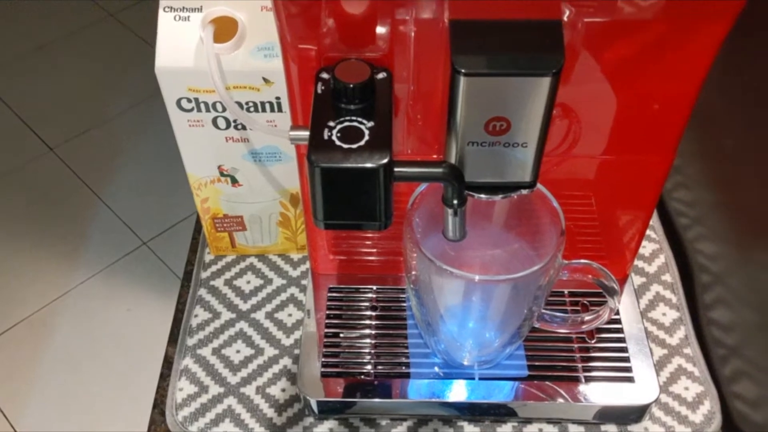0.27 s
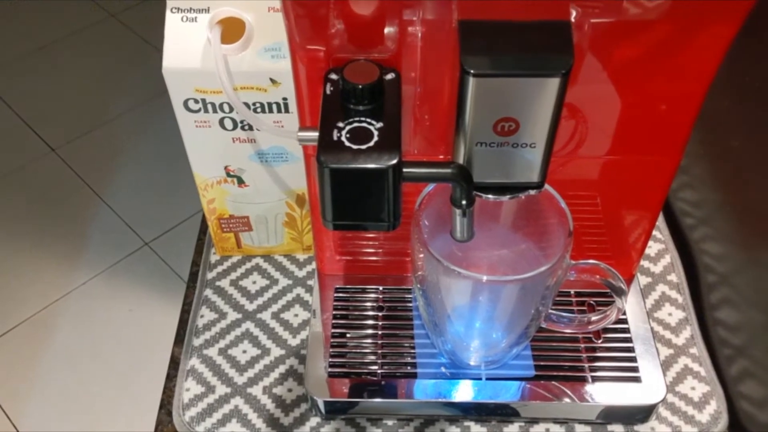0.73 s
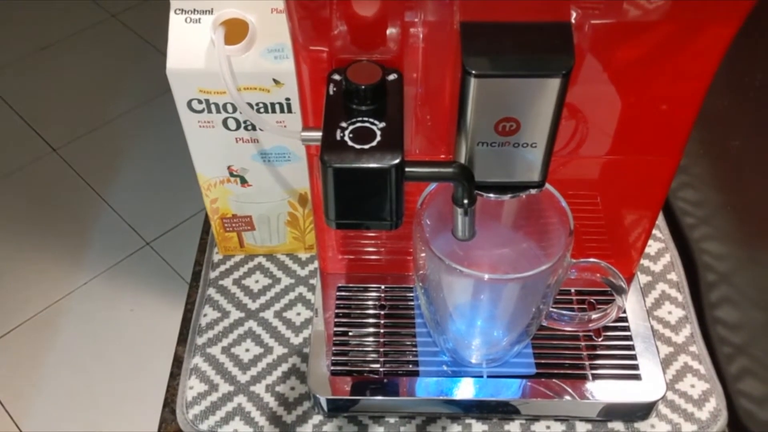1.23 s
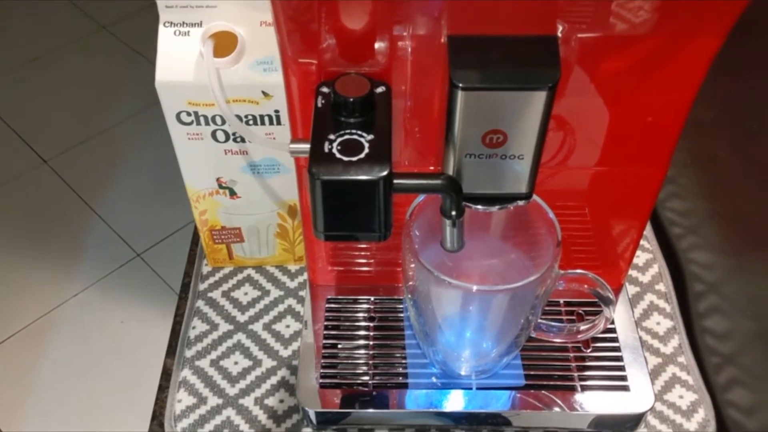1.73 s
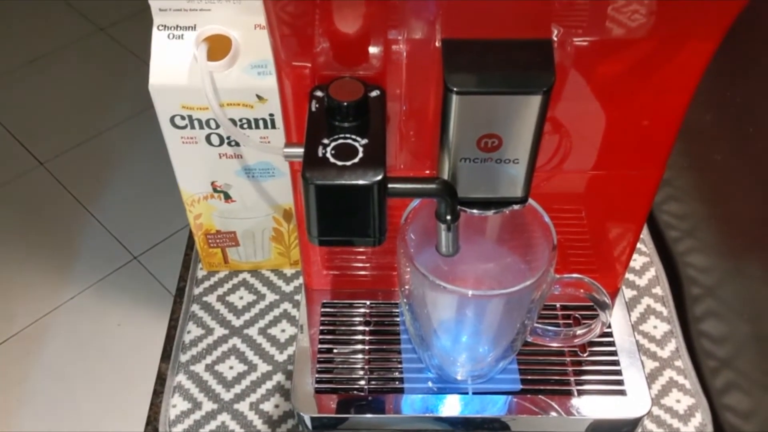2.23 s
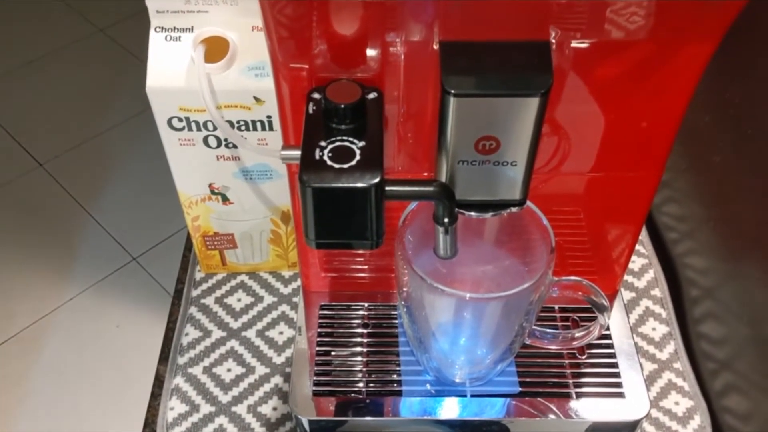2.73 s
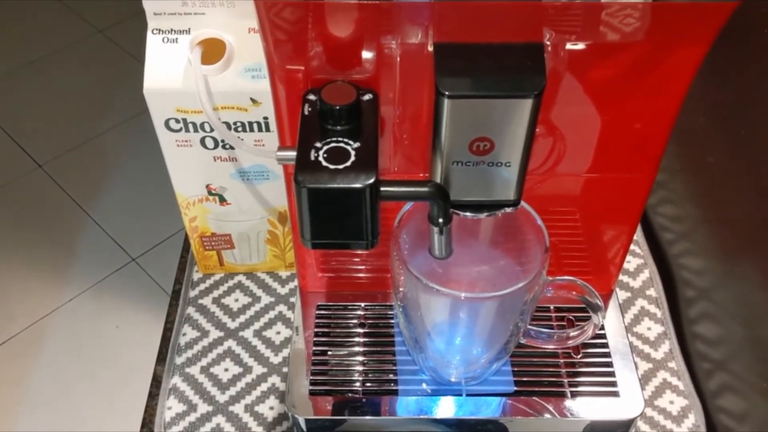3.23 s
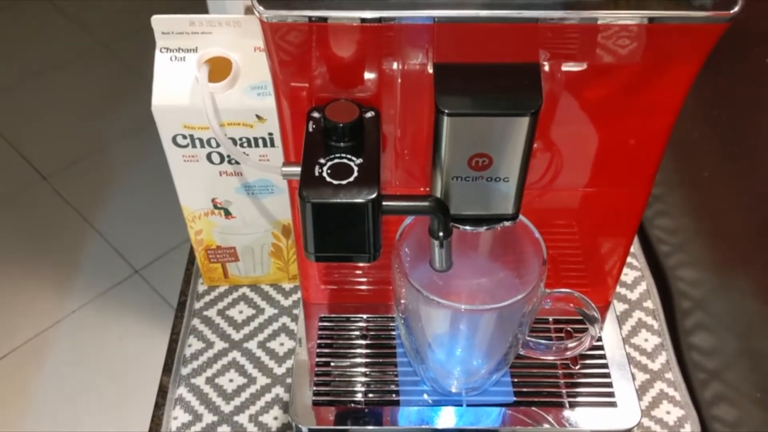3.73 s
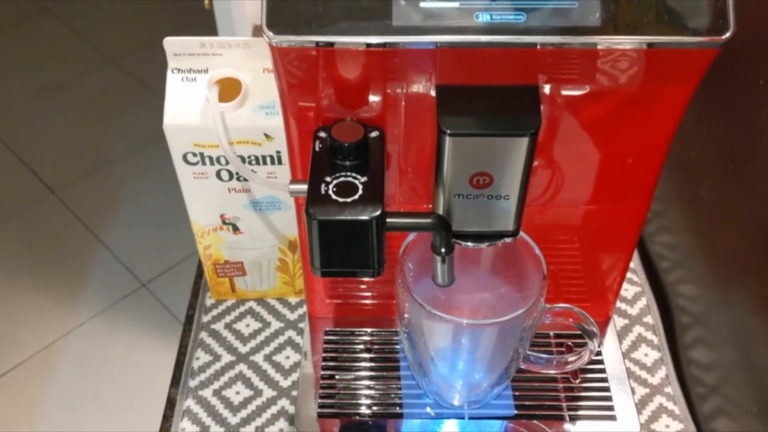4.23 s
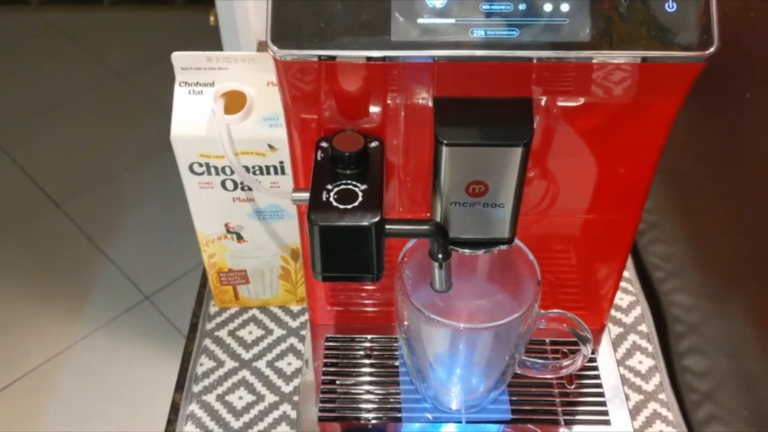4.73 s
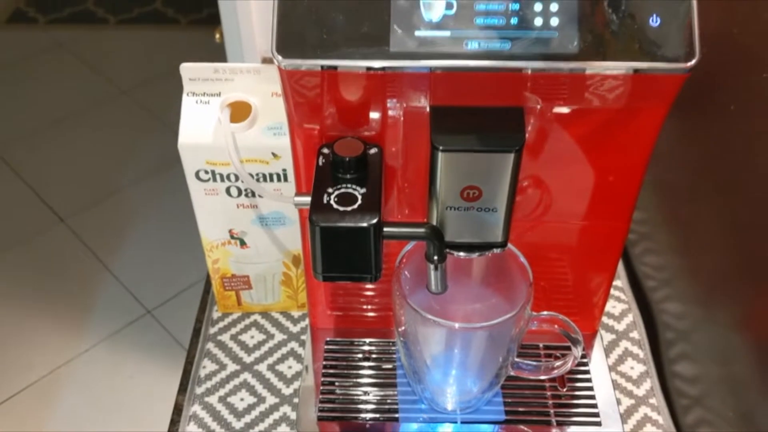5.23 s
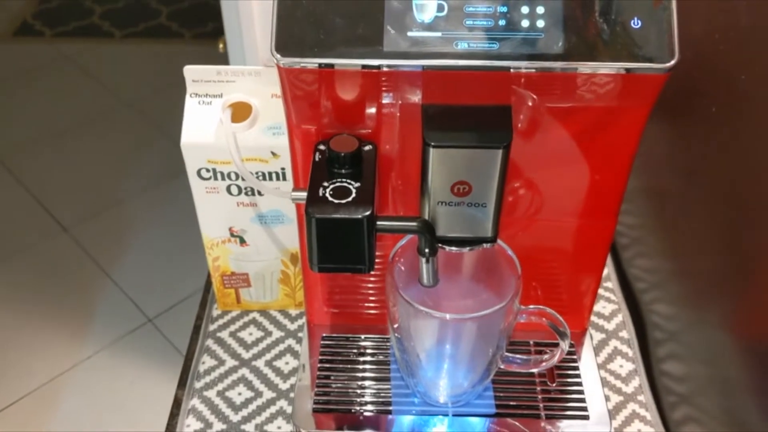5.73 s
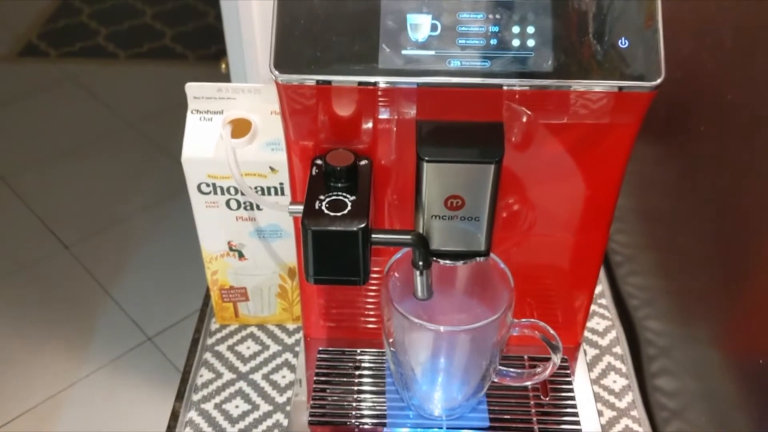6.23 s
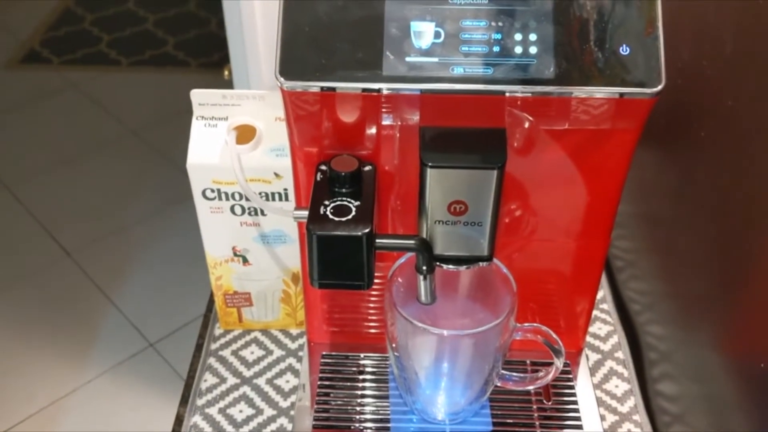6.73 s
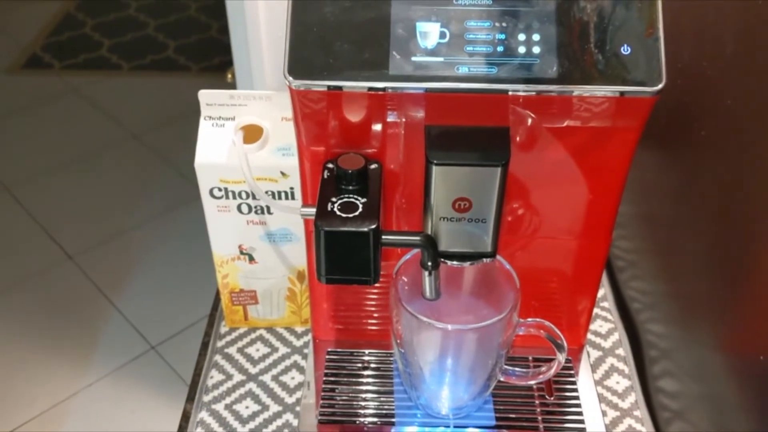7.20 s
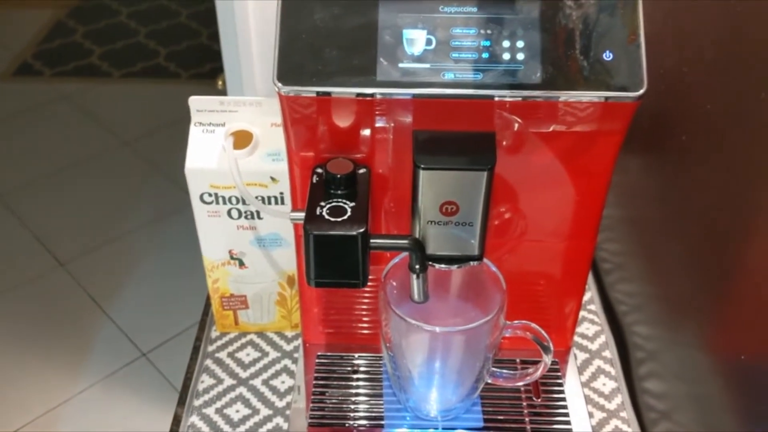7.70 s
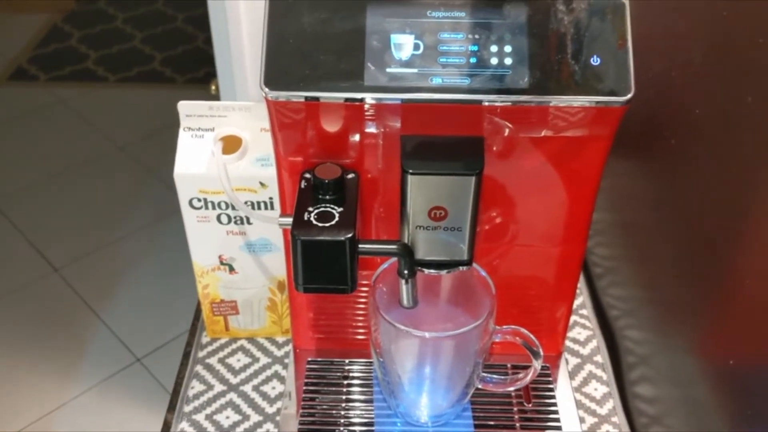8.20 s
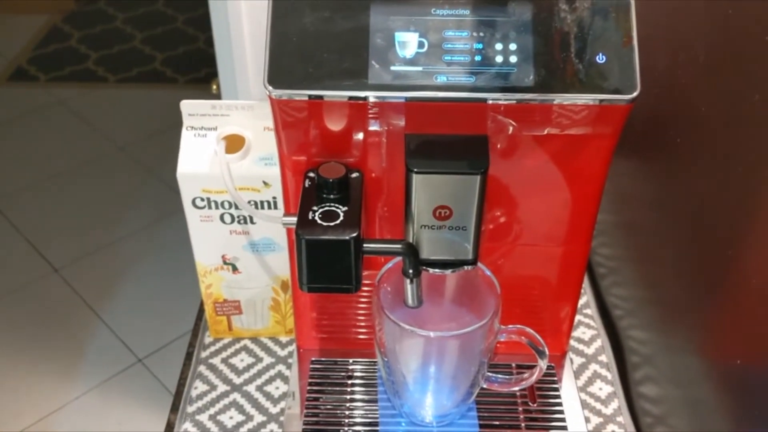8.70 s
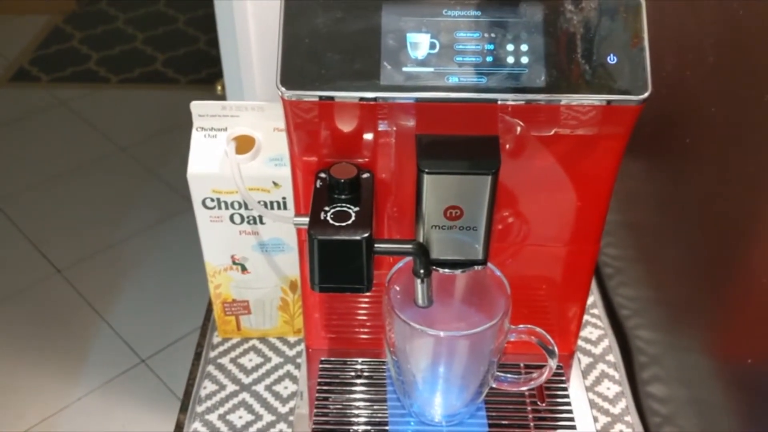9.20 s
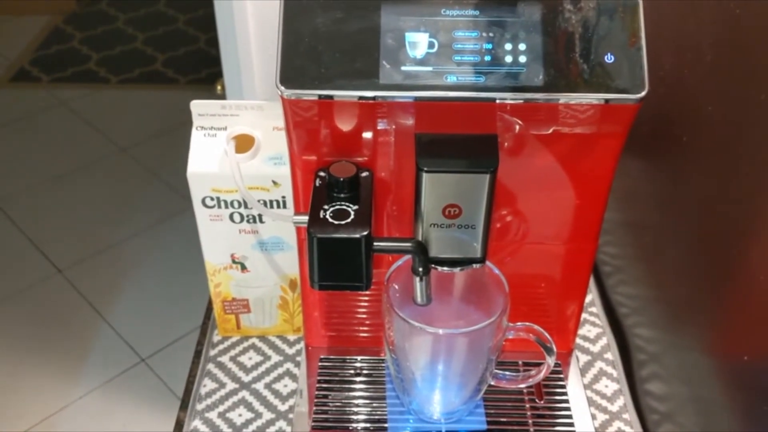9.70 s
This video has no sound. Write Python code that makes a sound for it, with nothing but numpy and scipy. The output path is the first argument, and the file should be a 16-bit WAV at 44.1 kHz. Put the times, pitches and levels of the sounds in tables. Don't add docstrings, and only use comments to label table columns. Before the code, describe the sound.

From 0 to about 3 seconds, a close coffee machine jets steam and milk into a glass: a loud, dense roar, hollow and resonant in the low mids, with a fainter high hiss and breathy whistling edge at the nozzle. It sputters finely and sags then surges with gulps, clearest around 1.7, 2.2 and 2.7 seconds. Near 3.0 the flow collapses, and at 3.1 a valve snaps shut with a dry double crack, dull thud and short room echo. A brief quiet gap reveals fridge hum and low building rumble. From 3.4, with a quick double around 3.63, a far softer piston pump beats evenly four times a second until the end near 10 seconds. Each stroke has a short metallic click, housing rattle, hollow low boom and tiny bouncing ticks; the boom grows slightly as pressure builds. Sound sits heavily right, the left weak and muffled.

```python
import sys
import numpy as np
from scipy import signal
from scipy.fft import rfft, irfft, next_fast_len
from scipy.io import wavfile
from scipy.ndimage import uniform_filter1d, map_coordinates

SR = 44100
rng = np.random.default_rng(int(sys.argv[2]) if len(sys.argv) > 2 else 0)


def volts_from_db(level):
    exponent = np.asarray(level, float) / 20
    return 10 ** exponent


def master_out(mix):
    frames = np.transpose(np.atleast_2d(mix))
    ceiling = np.clip(frames, -1, 1)
    pcm = np.round(ceiling * 32767).astype(np.int16)
    wavfile.write(sys.argv[1], SR, pcm)


N = 438794

# (time [s], roar level [dB])
STEAM_FLOW = [
    (0, -15),
    (1, -14.5),
    (2, -14.5),
    (2.92, -15),
    (3.01, -20),
    (3.1, -36),
]
# (frequency [Hz], density [dB per Hz])
ROAR_COLOUR = [(35, -71), (60, -30), (138, -21), (233, -3.5), (264, -16), (362, -0.5), (431, -10.5),
               (639, -2), (849, -7.5), (1730, -18.5), (2600, -39.5), (3380, -41.5), (5720, -120)]
# (frequency [Hz], width [Hz], level over the colour [dB])
GLASS_MODES = [(142.4, 15, 13.5), (200, 47, 2.5), (234.6, 9, 6), (244.5, 17, -18.5), (299, 21, 10.5),
               (308, 10, -17), (358, 16, 0), (437, 21, -6), (465, 80, 2.5), (568, 21, -13.5),
               (624.8, 31, 6.5), (679, 42, 3.5), (780, 36, 4.5), (850, 31, -3), (890, 12, -2),
               (951, 91, 5.5), (988, 19, -13.5), (1072, 8.2, -20), (1290, 22, -6), (1233, 35, 5),
               (1334, 22, 6), (1710, 110, 1), (1696, 19, 7.5), (1863, 79, 8)]
# (frequency [Hz], level against the roar [dB])
AIR_COLUMN = [(145, -18), (241, -17)]
# (frequency [Hz], density [dB per Hz])
HISS_COLOUR = [(1000, -40), (1800, -6.5), (2360, -12), (2970, -13.5), (4230, -9.5), (7570, -19),
               (10300, -14), (13100, -18.5), (16000, -19.5)]
# (frequency [Hz], width [Hz], level over the colour [dB])
NOZZLE_MODES = [(3440, 59, 4.5), (3774, 43, 9), (4160, 630, 3), (6560, 220, 2), (8880, 320, 8.5),
                (11800, 310, 9)]
# (time [s], peak level [dB])
VALVE_SNAP = [
    (3.118, -7.5),
]


def steam():
    flow_db = curves(STEAM_FLOW)[0]
    swing_db, lift = gulps()
    flowing = np.arange(N) < VALVE_SNAP[0][0] * SR

    roar_db = flow_db + swing_db + 5 + 0.96 * wobble(24.97)
    column = hum(AIR_COLUMN, wander_db=1.0, wander_turns=0.21)
    roar = volts_from_db(roar_db) * (noise(ROAR_COLOUR, GLASS_MODES, patchy_db=0.43) + column)

    lower_hz = 10230 + 170 * lift
    upper_hz = 14130 + 130 * lift
    tones = volts_from_db(1.5 * wobble(9.8)) * whistle(lower_hz, width_hz=300)
    tones += volts_from_db(-3.0 + 3.6 * wobble(8.4)) * whistle(upper_hz, width_hz=250)
    tone_db = -14 + 1.6 * lift

    hiss_db = -33 + 1.35 * (flow_db - STEAM_FLOW[0][1]) + 0.49 * swing_db
    sputter_db = 0.79 * wobble(26.72) + 0.86 * wobble(140)
    hiss = noise(HISS_COLOUR, NOZZLE_MODES, patchy_db=1.0) + volts_from_db(tone_db) * tones
    return flowing * (roar + volts_from_db(hiss_db + 7.5 + sputter_db) * hiss)


# (time [s], size [dB])
MILK_GULPS = [
    (.1, 0),
    (.73, -2.3),
    (0.971, 1),
    (1.199, 0.8),
    (1.659, 2),
    (1.99, 1),
    (2.238, 1.8),
    (2.68, 3),
]


def gulps():
    sag_s, surge_s, sing_s = 0.045, 0.034, 0.12
    early = N // 3
    swing_db, lift = np.zeros((2, N))
    for start, db in MILK_GULPS:
        t = np.arange(early) / SR - start
        sag = -np.exp(-abs(t) / sag_s)
        surge = np.exp(-abs(t) / surge_s)
        swing_db[:early] += db * np.where(t < 0, sag, surge)
        lift[:early] += db * np.exp(-((t / sing_s) ** 2) ** 2)
    return swing_db, lift


def whistle(hz, width_hz):
    hops = np.repeat(rng.standard_normal(N // 2000 + 1), 2000)[:N]
    turn = np.exp(2j * np.pi * np.cumsum(hz + 190 * hops) / SR)
    a, b = filtered(rng.standard_normal((2, 2, N)), lambda f: 1 / (1 + (f / width_hz) ** 2))
    return unit(np.real((a + 1j * b) * turn))


# (frequency [Hz], density [dB per Hz])
CRACK_COLOUR = [(120, -30), (200, -25), (880, 5.5), (1500, -10), (2280, -5.5), (3500, -10), (4700, -3.5),
                (5800, -12.5), (7070, -30), (9300, 2.5), (13400, -4.5), (16000, -23)]
# (frequency [Hz], width [Hz], level over the colour [dB])
SOLENOID_MODES = [(865, 180, 7), (1410, 160, 17), (2330, 230, 13), (4470, 360, 9), (5500, 300, 7.5)]
# (frequency [Hz], density [dB per Hz])
KNOCK_COLOUR = [(60, -44), (120, -8.5), (180, -1), (250, -4.5), (400, -9), (600, -15.5), (1000, -15.5),
                (1500, -19), (2100, -22.5), (3000, -34.5), (5000, -42.5)]
# (frequency [Hz], width [Hz], level over the colour [dB])
HOUSING_MODES = [(316, 16, -2), (412.4, 55, 6), (523, 14, 6.5), (616, 20, 7), (816, 160, 6), (998, 59, 5),
                 (1090, 33, 1.5), (1370, 110, 4), (1420, 87, 7), (1720, 50, 2), (1950, 37, 7)]


def valve():
    s, db = VALVE_SNAP[0]
    crack = bursts([s, s + 0.0034], [db + 4.5, db - 1.5], rise=0.00034, t60=0.02)
    crack = crack * noise(CRACK_COLOUR, SOLENOID_MODES)
    jolt = bursts([s + 0.004], [-19], rise=0.008, t60=0.17)
    thud = jolt * np.sin(2 * np.pi * 177 * np.arange(N) / SR)
    shake = bursts([s + 0.0059], [db - 15.0], rise=0.0056, t60=0.23) * noise(KNOCK_COLOUR, HOUSING_MODES)
    return crack + thud + shake


# (delay from landing [s], level [dB], drift as the water warms [dB per s])
BALL_BOUNCES = [
    (-.038, -10.5, 0),
    (-.030, -5, -1.1),
    (-.013, -7, .6),
    (0, -3, 0.09),
    (.013, -9, -0.5),
    (.026, -14, 0),
]
# (frequency [Hz], density [dB per Hz])
TICK_COLOUR = [(1500, -6.5), (3000, -13), (6000, -13), (9000, -12), (15500, -14.5), (16500, -60)]
# (frequency [Hz], width [Hz], level over the colour [dB])
BALL_MODES = [(4153, 1040, 13.5), (4120, 320, 2.5), (11350, 1100, 8)]


def pump(blows):
    s, db = np.transpose(blows)[:2]
    rattle = bursts([s - 0.016, s - 0.0012, s + 0.0092], [db - 11, db + 4.5, db - 2.0], rise=0.0068, t60=0.21)
    rattle = rattle * noise(KNOCK_COLOUR, HOUSING_MODES)
    rattle *= volts_from_db(1.94 * wobble(170) - 1.12)

    landing, tick_db = s + 0.0375, db - 5
    delay, bounce_db, drift_db = np.transpose(BALL_BOUNCES)
    strength_db = tick_db[:, None] + bounce_db + drift_db * (s[:, None] - s[0])
    strength_db += 0.9 * rng.standard_normal(strength_db.shape)
    ticks = bursts(landing[:, None] + delay, strength_db + 3.5, rise=0.00059, t60=0.036)
    return contacts(blows) + rattle + ticks * noise(TICK_COLOUR, BALL_MODES)


# (time [s], peak level [dB])
PUMP_RESTARTS = [
    (3.386, -28.5),
    (3.624, -26.5),
    (3.636, -33),
    (3.868, -28),
    (5.077, -29.5),
    (6.56, -29),
    (8.043, -30),
    (9.526, -32),
]
# (level [dB], level [dB])
BOOM_DB = (-13.5, -4)
# (pitch [Hz], pitch [Hz])
BOOM_HZ = (232.4, 246.2)


def strokes():
    beat_s, build_s = 0.2498, 2
    start, level_db = np.transpose(PUMP_RESTARTS)
    ends = np.append(start[1:], N / SR) - beat_s / 2
    rounds = [np.arange(a, max(a + 1 / SR, b), beat_s) for a, b in zip(start, ends)]
    s = np.concatenate(rounds)
    last = np.concatenate([(r == r[-1]) & (len(r) > 2) for r in rounds])
    pressure = 1 - np.exp(-(s - s[0]) / build_s)
    chance = rng.standard_normal((len(s), 4))
    db = np.repeat(level_db, [len(r) for r in rounds])
    db = db + 0.5 * (1 - pressure) + 0.4 * chance[:, 0]
    boom_db = np.interp(pressure, [0, 1], BOOM_DB) + 3.5 * last + 0.52 * chance[:, 1]
    boom_hz = np.interp(pressure, [0, 1], BOOM_HZ) + 3 * chance[:, 2]
    contact_db = 3 + chance[:, 3]
    return np.transpose([s, db, boom_db, boom_hz, contact_db])


# (frequency [Hz], level [dB], t60 [s])
ARMATURE_MODES = [(1255, -2.5, 0.076), (1536, -4.5, 0.084), (1690, -11, 0.073), (1970, 1.5, 0.027),
                  (2500, -11, 0.042)]


def contacts(blows):
    ring, t = np.zeros(N + SR), np.arange(SR // 8) / SR
    hz, mode_db, t60 = np.transpose(ARMATURE_MODES)[:, :, None]
    chances = rng.standard_normal((len(blows), 2, len(ARMATURE_MODES), 1))
    onset = 1 - np.exp(-t / 0.0053)
    for (start, db, _, _, contact_db), (level_chance, pitch_chance) in zip(blows, chances):
        decay = volts_from_db(mode_db + 0.53 * level_chance - 60 * t / t60)
        modes = decay * np.sin(2 * np.pi * hz * (1 + 0.022 * pitch_chance) * t)
        first = round((start - 0.003) * SR)
        ring[first:][:len(t)] += volts_from_db(db + contact_db) * onset * modes.sum(axis=0)
    return ring[:N]


def booms(blows):
    boom, t = np.zeros(N + SR), np.arange(SR // 4) / SR
    travel = np.minimum(t / 0.044, 1)
    flutter = 1 + 0.5 * np.cos(2 * np.pi * (t - 0.058) / 0.0268)
    swell = np.sin(np.pi * travel) + volts_from_db(-5.5) * travel * flutter * volts_from_db(-60 * t / 0.5)
    counter = np.sin(2 * np.pi * 60 * t) * np.sin(np.pi * np.minimum(t / 0.11, 1))
    for start, level_db, boom_db, hz, _ in blows:
        housing = volts_from_db(boom_db + 8.0) * swell * np.sin(2 * np.pi * hz * t)
        first = round((start - 0.004) * SR)
        boom[first:][:len(t)] += volts_from_db(level_db) * (housing + volts_from_db(-3.5) * counter)
    return boom[:N]


# (frequency [Hz], t60 [s])
WALL_DECAY = [(100, 0.53), (500, 0.6), (2000, 0.49), (5000, 0.37), (10000, 0.19), (16000, 0.32)]


def walls(x):
    hz, t, z = signal.stft(rng.standard_normal((2, SR // 2)), SR, nperseg=256)
    decay = volts_from_db(-60 * t / along(WALL_DECAY, hz)[:, None])
    tail = signal.istft(z * decay, SR, nperseg=256)[1]
    late = np.pad(x, ((0, 0), (260, 0)))
    return signal.fftconvolve(late, tail / np.linalg.norm(tail[0]), axes=1)[:, :N]


# (frequency [Hz], density [dB per Hz])
AIR_COLOUR = [(60, -31), (100, -10.5), (200, -2.5), (276, -10), (396, -8.5), (460, -17), (1300, -21),
              (2840, -31), (4070, -33), (7370, -40.5), (11500, -37), (16000, -40)]
# (frequency [Hz], width [Hz], level over the colour [dB])
FRIDGE_MODES = [(116, 8.7, -7), (209, 21, 4), (385, 25, 2.5), (506, 18, 7.5)]
# (frequency [Hz], level [dB rms])
FRIDGE_MOTOR = [(119.5, -52), (191.5, -43)]
# (frequency [Hz], density [dB per Hz])
RUMBLE_COLOUR = [(8.8, -54), (15, -49), (34, 1.5), (54, -3.5), (74, 0.5), (103, -10.5), (130, -28),
                 (170, -33), (290, -120)]
# (time [s], level [dB])
PHONE_GAIN = [
    (0, -12),
    (3.3, -6),
    (3.5, -1),
    (9.95, -4),
]


def kitchen():
    air = volts_from_db(-41 + 1.2 * wobble(4.4)) * noise(AIR_COLOUR, FRIDGE_MODES, patchy_db=-1.2)
    rumble = volts_from_db(-35.5 + 0.61 * wobble(6)) * noise(RUMBLE_COLOUR)
    motor = hum(FRIDGE_MOTOR, wander_db=2.0, wander_turns=0.1)
    return air + motor + volts_from_db(curves(PHONE_GAIN)[0]) * rumble


def hum(lines, wander_db, wander_turns):
    t, tones = np.arange(N) / SR, np.zeros(N)
    for hz, db in lines:
        level = volts_from_db(db + 2 + wander_db * wobble(7))
        tones += level * np.sin(2 * np.pi * (hz * t + wander_turns * wobble(5)))
    return tones


def unit(x):
    return x / np.sqrt(np.mean(x ** 2) + 1e-20)


def along(points, hz):
    f, v = np.transpose(points)
    return np.interp(np.log(hz + 1), np.log(f + 1), v)


def curves(rows):
    s, *cols = np.transpose(rows)
    return [np.interp(np.arange(N) / SR, s, c) for c in cols]


def wobble(rate):
    coarse = np.arange(0, N + 64, 64)
    knots = rng.standard_normal(int(N * rate / SR) + 6)
    return np.interp(np.arange(N), coarse, map_coordinates(knots, [coarse * rate / SR]))


def filtered(x, response):
    m = next_fast_len(N + SR // 2)
    return irfft(rfft(x, m) * response(np.fft.rfftfreq(m, 1 / SR)), m)[..., :N]


def noise(spectrum, modes=(), patchy_db=None):
    pair = rng.standard_normal((2, N))
    if patchy_db:
        z = signal.stft(pair, nperseg=512)[2]
        field = uniform_filter1d(rng.standard_normal(z.shape[1:]), size=6, axis=0)
        field = uniform_filter1d(field, size=8, axis=1)
        pair = signal.istft(z * volts_from_db(patchy_db * unit(field)), nperseg=512)[1][:, :N]

    def colour(hz):
        peaks_db = sum(db / (1 + (2 * (hz - centre) / width) ** 2) for centre, width, db in modes)
        return volts_from_db(along(spectrum, hz) + peaks_db)

    return unit(filtered(pair, colour))


def bursts(times, levels_db, rise, t60):
    marks, t = np.zeros(N + SR), np.arange(SR // 2) / SR
    np.add.at(marks, np.round(np.ravel(times) * SR).astype(int), volts_from_db(np.ravel(levels_db)))
    shape = (1 - np.exp(-t / rise)) * volts_from_db(-60 * t / t60)
    return signal.fftconvolve(marks, shape)[:N]


def ports(pair, alike, left_db):
    def blend(hz):
        share = np.clip(along(alike, hz), 0, 1)
        return volts_from_db(along(left_db, hz)) * np.array([share, np.sqrt(1 - share ** 2)])

    return np.array([filtered(pair, blend).sum(axis=0), pair[0]])


# (frequency [Hz], likeness [-1 to 1])
STEAM_LIKENESS = [(60, 0.42), (130, 0.96), (290, 0.99), (640, 0.73), (1410, 0.46), (3100, -0.44),
                  (6820, 0.096), (15000, -0.19)]
# (frequency [Hz], level [dB])
STEAM_LEFT = [(60, -15), (110, -18), (200, -17), (380, -17.5), (700, -14), (1290, -19), (2380, -11.5),
              (4400, -15.5), (8120, -10.5), (15000, -24.5)]
# (frequency [Hz], likeness [-1 to 1])
PUMP_LIKENESS = [(60, 1), (130, 0.74), (290, 0.71), (640, 0.59), (1410, -0.48), (3100, -0.16),
                 (6820, -0.56), (15000, 0.01)]
# (frequency [Hz], level [dB])
PUMP_LEFT = [(60, -16), (110, -25), (200, -21), (380, -18.5), (700, -16.5), (1290, -20.5), (2380, -12.5),
             (4400, -23), (8120, -9.5), (15000, -22)]


def scene():
    blows = strokes()
    snap, knocks = valve(), pump(blows)
    echo = walls(volts_from_db(-12.5) * snap + volts_from_db(-11.5) * knocks)
    hits = snap + knocks + booms(blows) + echo
    jet = ports(steam(), STEAM_LIKENESS, STEAM_LEFT)
    return jet + ports(hits + kitchen(), PUMP_LIKENESS, PUMP_LEFT)


def low_pass(x):
    return signal.sosfilt(signal.butter(12, 17000, fs=SR, output="sos"), x)


def record(dry):
    soft = dry / (1 + np.abs(dry / 0.65) ** 3.2) ** (1 / 3.6)
    mix = filtered(soft, lambda hz: hz < 15830)
    return low_pass(mix)


dry = scene()
out = record(dry)
master_out(out)
```